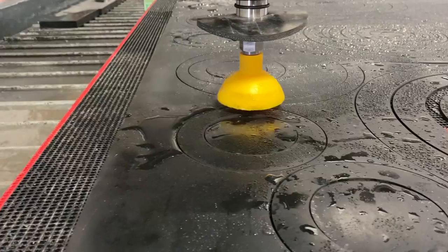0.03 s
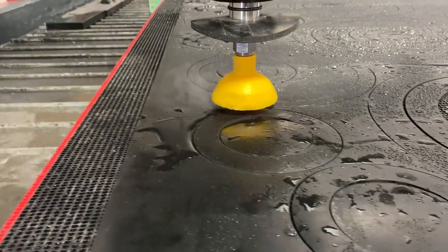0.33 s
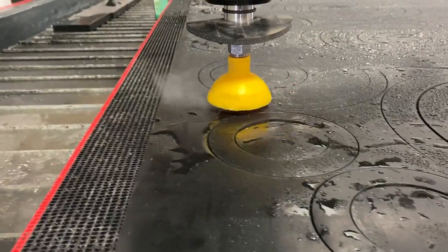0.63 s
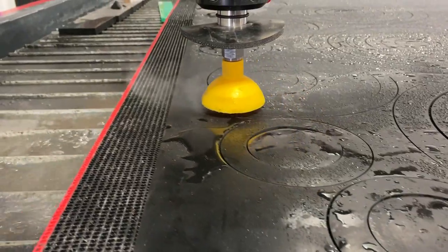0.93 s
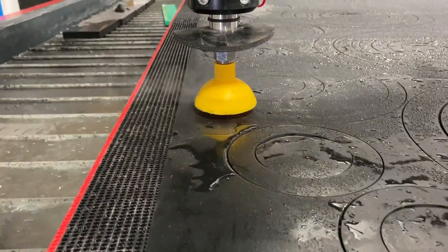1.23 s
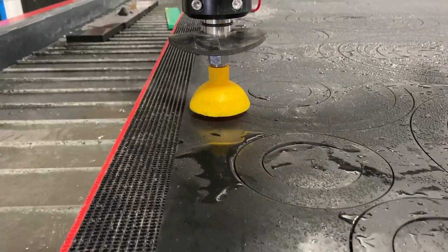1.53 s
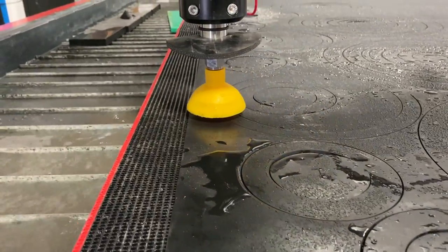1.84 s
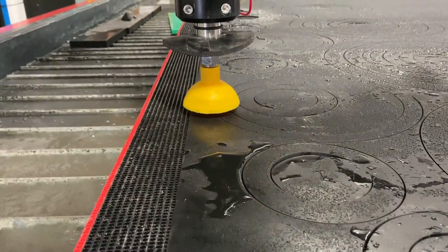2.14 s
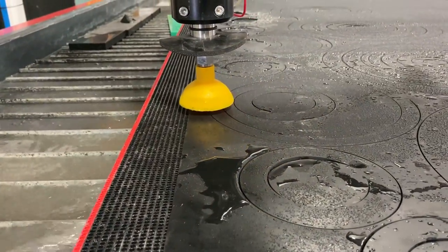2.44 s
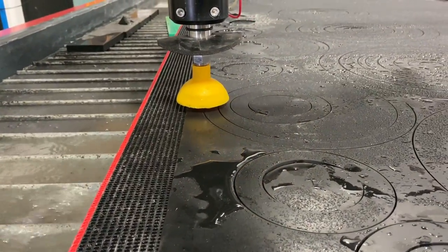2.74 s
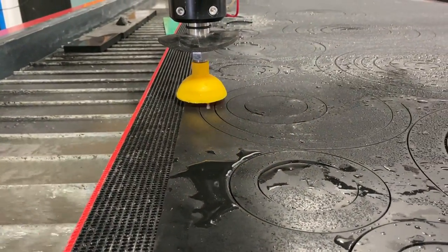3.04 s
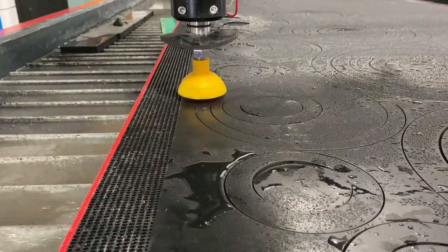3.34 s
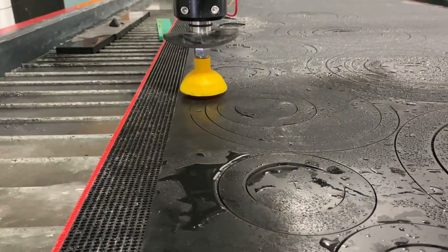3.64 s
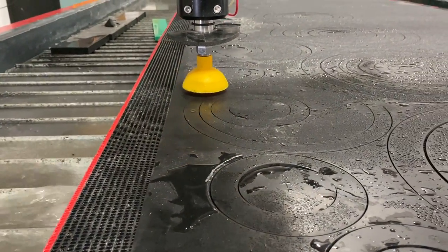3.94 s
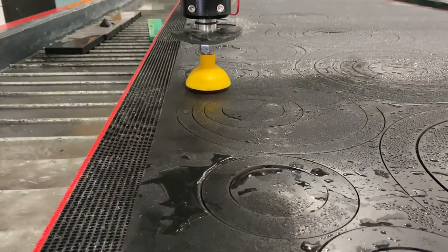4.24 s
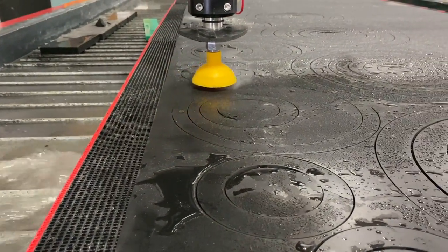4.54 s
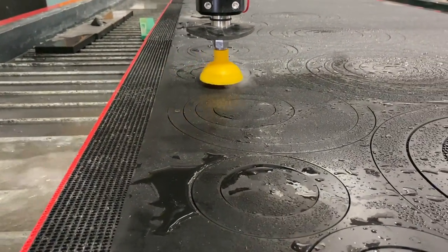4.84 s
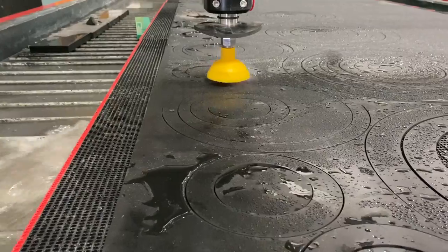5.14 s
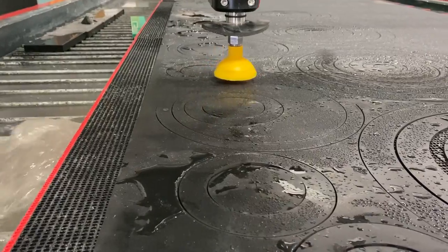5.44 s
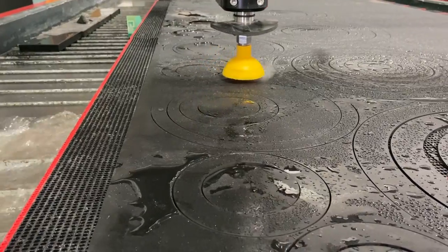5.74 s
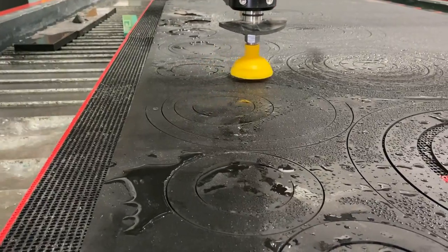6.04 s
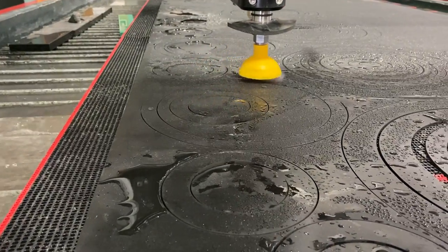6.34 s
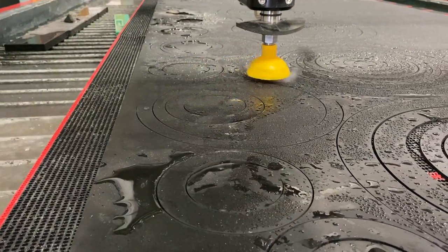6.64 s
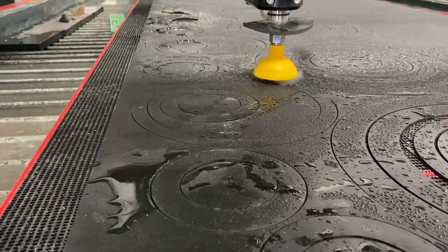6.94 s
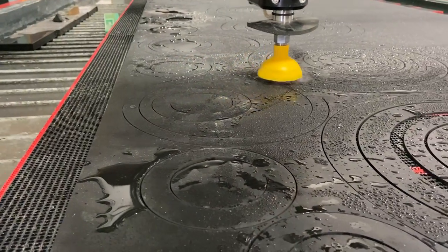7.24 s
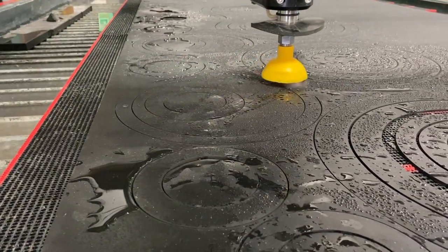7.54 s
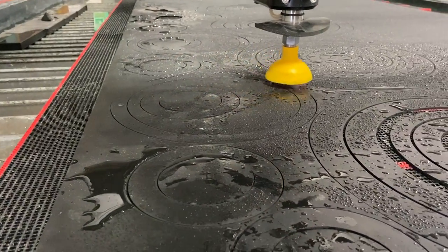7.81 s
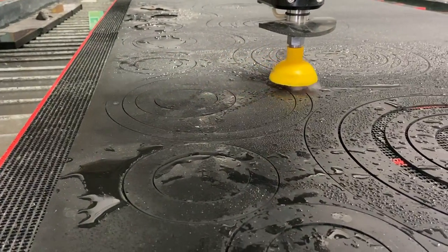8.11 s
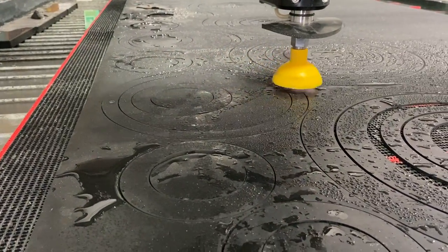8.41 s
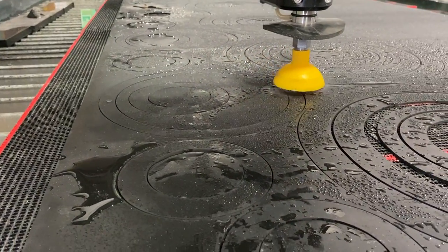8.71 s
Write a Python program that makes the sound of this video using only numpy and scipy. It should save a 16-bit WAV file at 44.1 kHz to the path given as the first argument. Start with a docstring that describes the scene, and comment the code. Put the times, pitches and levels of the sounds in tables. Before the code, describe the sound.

A continuous, high hiss comes from a nearby water jet cutting rubber in a workshop. Bursts of sputtering, sizzling spray soon join it, slightly to the left, and water briefly bubbles up onto the sheet. From about halfway the spray settles to lighter spitting. Deep churning, gurgling and soft thumps from the water tank and an even background rush run beneath it all.

```python
"""A bright, steady hiss over churning water: a high-pressure jet cuts a rubber sheet on a tank's slats.
The hiss is rushing air and droplets ringing the nozzle and its splash cup. Below, the spent jet drags
air into the tank, where bubbles gurgle and big pockets thump; once, water wells up onto the sheet.
In front, the deflected spray rasps, spits, sings and sizzles in surges,
hardest in the first half, as the head works toward the left edge."""
import sys
import numpy as np
from scipy import signal
from scipy.fft import rfft, irfft, next_fast_len
from scipy.io import wavfile

SR = 44100
rng = np.random.default_rng(int(sys.argv[2]) if len(sys.argv) > 2 else 0)


def output_pcm(signal):
    """Save a mono or channel-first signal as 16-bit PCM at the path in sys.argv[1].

    Samples are clipped to [-1, 1] before scaling.
    """
    pcm = np.clip(np.atleast_2d(signal).T, -1, 1) * 32767
    wavfile.write(sys.argv[1], SR, np.round(pcm).astype(np.int16))


N = 395577


def from_db(db):
    """Decibels to gain."""
    return 10 ** (np.asarray(db) / 20)


def rms_one(x):
    """Scale to unit rms."""
    return x / np.sqrt(np.mean(x ** 2) + 1e-20)


def automation(rows):
    """Breakpoints (time, values...) to one sample-by-sample curve per value column."""
    times, *columns = np.transpose(rows)
    return [np.interp(np.arange(N) / SR, times, column) for column in columns]


def drift(rate):
    """Smooth random modulation of rms about 1 that changes about `rate` times a second."""
    hop, settle = 40, 2000
    pole = np.exp(-2 * np.pi * rate * hop / SR)
    noise = rng.standard_normal(N // hop + settle + 2)
    slow = signal.lfilter([1], [1, -2 * pole, pole * pole], noise)[settle:]
    return np.interp(np.arange(N) / hop, np.arange(len(slow)), rms_one(slow))


def delay(x, delay_s):
    """The same sound a little later."""
    return np.interp(np.arange(N) - delay_s * SR, np.arange(N), x, left=0)


def resonate(x, hz, width_hz):
    """A two-pole resonance with gain 1 at its peak."""
    radius = np.exp(-np.pi * width_hz / SR)
    feedback = [1, -2 * radius * np.cos(2 * np.pi * hz / SR), radius ** 2]
    return signal.lfilter(np.array([1, 0, -1]) * (1 - radius ** 2) / 2, feedback, x + 1e-18)


def equalise(x, curve):
    """Shape x with an EQ curve of (frequency, gain) points; rms 1."""
    size = next_fast_len(N)
    hz, gain_db = np.transpose(curve)
    bin_hz = np.arange(size // 2 + 1) * SR / size
    gain = from_db(np.interp(np.log(bin_hz + 1), np.log(hz), gain_db, left=-90, right=-90))
    return rms_one(irfft(rfft(x, size) * gain, size)[..., :N])


def grains(per_s, spread_db):
    """Random impacts, many small and a few large; rms 1."""
    hits = rng.random(N) < per_s / SR
    sizes = from_db(spread_db * np.minimum(rng.exponential(1, N), 4))
    polarity = np.sign(rng.random(N) - .5)
    return rms_one(hits * sizes * polarity)


def bubbles(low_hz, high_hz, per_s, cycles, spread_db, count=14):
    """Bubbles of `count` sizes, each ringing for a few cycles; rms 1."""
    rings = (resonate(grains(per_s / count, spread_db), hz, hz / cycles)
             for hz in np.geomspace(low_hz, high_hz, count))
    return rms_one(sum(rms_one(ring) for ring in rings))


def turbulence(modes, drop_share, wander_db, wander_rate):
    """Rushing air and droplets ring resonances whose levels wander; returns (direct, scattered)."""
    out = np.zeros((2, N))
    drops = grains(per_s=2500, spread_db=6.0)
    for hz, width_hz, level_db in modes:
        drive = rng.standard_normal((2, N))
        drive[0] += drop_share * np.roll(drops, rng.integers(N))
        ring = resonate(resonate(drive, hz, width_hz), hz, width_hz)
        gain = from_db(level_db + wander_db * drift(wander_rate))
        out += ring / ring.std(axis=1, keepdims=True) * gain
    return out


def stereo(direct, scattered, pan_db):
    """Direct sound reaches both ears in phase, scattered sound in opposition; positive pan is left."""
    balance = from_db(np.array([pan_db, -pan_db]).reshape(2, -1) / 2)
    return np.array([direct + scattered, direct - scattered]) * balance


def reflections(direct, scattered, pan_db):
    """Sheet, gantry and tank wall echo; a source further left is wider and leads in the left ear."""
    mid = direct + 0.18 * delay(direct, .0113)
    side = 0.056 * delay(direct, 0.00144) - .5 * delay(direct, 0.0054) + 0.76 * scattered
    left, right = stereo(mid, from_db(-8 + 0.59 * pan_db) * side, pan_db)
    lag_rad = 0.26 * pan_db
    lagging_right = signal.hilbert(right, next_fast_len(N))[:N] * np.exp(-1j * lag_rad)
    return np.array([left, lagging_right.real])


# Tone of the background bed: (frequency [Hz], relative gain [dB])
WASH_EQ = [(25, -22), (82, 6.5), (189, -3.5), (446, -17), (532, -19), (808, -14.5), (963, -14.5),
           (1710, -9), (1910, -19.5), (3230, -18.5), (4490, -38), (4800, -82)]

def wash():
    """The bed: an even rush of tank and shop, nearly mono in the bass."""
    direct, scattered = equalise(rng.standard_normal((2, N)), WASH_EQ)
    scattered = signal.sosfilt(signal.butter(1, 600, "high", fs=SR, output="sos"), scattered)
    return from_db(-38.5) * stereo(direct, from_db(-22) * scattered, pan_db=-0.65)


# Tone of large slow bubbles and of small ones near the surface: (frequency [Hz], relative gain [dB])
CHURN_EQ = [(25, -30), (40, -28), (55, -12.5), (90, -1.5), (130, -1.5), (220, 2), (290, -8), (400, -21)]
GURGLE_EQ = [(180, -11.5), (280, -2), (400, -4), (520, -3.5), (660, -4.5), (800, -5.5), (1100, -14.5)]
# Faders of the same two bubble layers: (time [s], level before trim [dB])
CHURN_FADER = [(0.1, -33.5), (0.99, -27), (1.5, -29), (1.9, -34.5), (2.08, -31), (3.3, -38.5), (3.44, -31),
               (4.33, -31.5), (4.45, -36.5), (5.36, -33.5), (5.8, -45), (5.93, -33), (8.97, -33.5)]
GURGLE_FADER = [(0.1, -40.5), (0.55, -32), (1.15, -33), (1.73, -34.5), (2.1, -31.5), (2.15, -34.5),
                (2.47, -31), (2.52, -40), (3.01, -31), (4.5, -40), (4.7, -35), (5.62, -44), (6.4, -36),
                (8.97, -43)]

def tank(pan_db, churn_trim_db=-0.5, gurgle_trim_db=-1):
    """The spent jet drags air under water: a deep churn and a lighter gurgle."""
    churn_db, = automation(CHURN_FADER)
    gurgle_db, = automation(GURGLE_FADER)
    churn = equalise(bubbles(45.8, 357, per_s=750, cycles=2.5, spread_db=3.5), CHURN_EQ)
    gurgle = equalise(bubbles(244.4, 866, per_s=1100, cycles=15.4, spread_db=3.5), GURGLE_EQ)
    churn_scatter = from_db(-16.5) * equalise(rng.standard_normal(N), CHURN_EQ)
    gurgle_scatter = equalise(rng.standard_normal(N), GURGLE_EQ)
    deep = stereo(churn, churn_scatter, pan_db=-2.1)
    light = reflections(gurgle, gurgle_scatter, 0.39 * pan_db)
    return deep * from_db(churn_db + churn_trim_db) + light * from_db(gurgle_db + gurgle_trim_db)


# Thumps of big air pockets bursting in the tank: (time [s], peak [dB], starting pitch [Hz])
POCKET_HITS = [(0.895, -17, 91), (1.118, -19, 148), (1.476, -21, 196), (2.26, -17, 172), (3.372, -15.5, 95),
               (3.523, -21, 114), (3.691, -18.5, 112), (4.274, -19.5, 130), (4.368, -25, 110),
               (6.01, -20, 120), (7.102, -17, 196), (7.44, -23, 161)]

def air_pockets(swell_cycles=0.63, rise=1.5):
    """A pocket swells, rings and bends up in pitch as it nears the surface; small ones die sooner."""
    out, t = np.zeros(N + SR), np.arange(SR // 8) / SR
    for start_s, peak_db, hz in POCKET_HITS:
        at, age = int(start_s * SR), t * hz / swell_cycles
        envelope = from_db(peak_db) * age * np.exp(1 - age)
        out[at:at + len(t)] += envelope * np.sin(2 * np.pi * hz * t * (1 + rise * t))
    return stereo(out[:N], 0, pan_db=-1.2)


# Fader of the water welling up through the cut: (time [s], level [dB])
SPLASH_FADER = [(2.55, -61), (2.75, -33.5), (2.88, -33), (3.12, -45), (3.22, -49), (3.3, -67)]

def splash(pan_db):
    """Small bubbles burst in the water that wells up onto the sheet."""
    level_db, = automation(SPLASH_FADER)
    froth = bubbles(500, 1790, per_s=900, cycles=18.0, spread_db=3.0)
    return reflections(from_db(level_db) * froth, 0, pan_db)


# Resonances of the nozzle and its cup: (frequency [Hz], width [Hz], level before fader [dB])
HISS_BANDS = [(12100, 810, -47), (13860, 450, -42), (14550, 630, -39), (15300, 520, -36.3)]
WHISTLE_BANDS = [(10040, 800, -40), (10470, 270, -40)]
RUSH_BANDS = [(5286, 340, -47), (6170, 1280, -40.5), (7530, 1900, -47.5)]
# Faders of the nozzle: (time [s], whistle gain [dB], rush gain [dB])
NOZZLE_FADERS = [(0.1, 6, 4), (1.1, 5, 3), (3.2, 4.5, -3.5), (4.3, -1, 2.5), (4.35, 0, 1.5),
                 (5.7, 1.5, 2.5), (8.4, 1.5, 4), (8.97, -1.5, 1)]

def nozzle(sputter):
    """The jet's own voice: a fine hiss, the cup's airy whistle and a lower rush, all lightly shaken."""
    whistle_db, rush_db = automation(NOZZLE_FADERS)
    hiss_db = 0.3 + 0.35 * whistle_db   # the hiss follows part of the whistle's swing
    layers = (HISS_BANDS, hiss_db), (WHISTLE_BANDS, whistle_db), (RUSH_BANDS, rush_db)
    direct, scattered = sum(
        from_db(gain_db) * turbulence(bands, drop_share=0.64, wander_db=0.87, wander_rate=13)
        for bands, gain_db in layers)
    direct = direct + 0.26 * delay(direct, 0.005)
    return stereo(direct, from_db(-9.5) * scattered, pan_db=-0.25) * from_db(.5 * sputter)


# Crackles of drops spat out of the cut: (time [s], level before trim [dB])
SPIT_HITS = [(2.109, -24), (2.168, -20), (3.2954, -26), (3.365, -33), (3.407, -31), (3.979, -30),
             (4.0063, -30), (4.095, -26), (5.2026, -33), (5.246, -28), (5.305, -29), (5.408, -28),
             (5.4296, -33), (5.8606, -31), (6.635, -34), (6.573, -28), (6.821, -31), (6.87, -33),
             (7.0145, -34), (7.3167, -30), (7.3885, -35), (7.9344, -29), (8.0207, -31), (8.099, -30),
             (8.312, -33), (8.3764, -34), (8.413, -42), (8.5804, -29)]

def spits(trim_db=-11, length_s=0.038, centre_hz=3390, pitch_spread=0.13, width_hz=230, drops=26):
    """A burst of drops with a few stragglers; each ticks and rings briefly at its own pitch."""
    out, t = np.zeros(N + SR), np.arange(SR // 10) / SR
    for start_s, level_db in SPIT_HITS:
        arrival, size, detune = rng.random((3, drops))
        onset_s = -.5 * length_s * np.log(arrival[:, None])
        age = np.maximum(t - onset_s, 0)
        hz = centre_hz * (1 + pitch_spread * (2 * detune[:, None] - 1))
        rings = np.exp(-np.pi * width_hz * age) * np.cos(2 * np.pi * hz * age) * (age > 0)
        crackle = (size - .5) @ rings
        crackle /= np.sqrt(np.sum(crackle ** 2) / (length_s * SR))
        at = int(start_s * SR)
        out[at:at + len(t)] += from_db(level_db + trim_db) * crackle
    return out[:N]


# Notes of a cavity or slat edge caught by the jet:
# (start [s], length [s], pitch [Hz], width [Hz], level [dB])
EDGE_NOTES = [(0.101, 0.39, 1740, 300, -42), (0.554, 0.086, 282, 101, -23.5), (0.715, 0.053, 644, 200, -33),
              (0.845, 0.036, 7000, 650, -30.5), (1.001, 0.063, 3230, 700, -31.5),
              (0.719, 0.5, 370, 201, -35.5), (1.184, 0.049, 3030, 600, -35),
              (1.253, 0.052, 3150, 650, -29.5), (1.364, 0.11, 3200, 750, -28.5),
              (1.507, 0.065, 7100, 700, -34), (1.511, 0.065, 2250, 500, -37),
              (1.642, 0.11, 3200, 600, -30.5), (1.778, 0.14, 2120, 160, -30.5),
              (1.78, 0.14, 2440, 140, -36), (1.777, 0.13, 2910, 140, -42), (1.812, .11, 660, 160, -31),
              (1.83, 0.021, 6950, 700, -29), (1.89, 0.021, 3530, 600, -30), (2.03, 0.1, 620, 201, -30),
              (2.198, .26, 1746, 260, -28.5), (2.257, 0.24, 685, 110, -38), (2.289, 0.22, 3560, 340, -36),
              (2.716, 0.027, 7270, 700, -30.5), (2.718, 0.19, 2210, 220, -33.5),
              (2.801, .41, 1050, 222, -37), (2.8, 0.15, 1140, 260, -38.5), (3.003, 0.043, 2240, 600, -32),
              (3.088, 0.043, 660, 450, -29), (3.203, 0.036, 570, 220, -27.5),
              (3.302, 1.02, 1723, 220, -42.5), (3.297, 0.91, 3610, 320, -44),
              (3.547, 0.094, 6960, 550, -35), (3.72, 0.08, 7300, 450, -35.5), (3.85, 0.088, 7340, 450, -34),
              (5.16, 0.11, 1510, 500, -42), (7.161, 0.056, 600, 350, -36.5), (7.882, 0.82, 1653, 210, -41),
              (7.983, 0.72, 3270, 280, -47.5)]

def singing_edges(rough_db=1.5, rough_rate=77, fade_s=.012):
    """Turbulence drives a resonance that catches abruptly, flutters and breaks off as the head moves."""
    out = np.zeros(N + SR)
    flutter = from_db(rough_db * drift(rough_rate))
    for start_s, length_s, hz, width_hz, level_db in EDGE_NOTES:
        t = np.arange(int((length_s + fade_s) * SR)) / SR
        gate = np.clip(np.minimum(t, t[-1] - t) / fade_s, 0, 1)
        drive = rng.standard_normal(2 * SR)
        ring = resonate(resonate(drive, hz, width_hz), hz, width_hz)[-len(t):]
        at = int((start_s - fade_s / 2) * SR)
        out[at:at + len(t)] += from_db(level_db) * gate * rms_one(ring * flutter[at:at + len(t)])
    return out[:N]


# Swells of the spray: (start [s], length [s], rasp gain [dB], roar gain [dB], sizzle gain [dB])
SURGE_CUES = [(0.568, 0.057, -33, -33.5, -56), (0.7, 0.076, -39, -51, -33.5),
              (0.827, 0.081, -26.5, -39, -25.5), (0.97, 0.12, -29, -32.5, -50), (1.1, 0.021, -32, -40, -36),
              (1.248, 0.072, -32.5, -31, -49), (1.383, 0.14, -31, -29.5, -33.5),
              (1.516, 0.062, -30.5, -30, -26.5), (1.636, 0.11, -33.5, -29.5, -34),
              (1.775, 0.11, -30, -27, -31.5), (2.085, 0.025, -37, -29.5, -31),
              (2.177, 0.1, -28, -36, -29.5), (2.277, 0.21, -32, -33.5, -26.5),
              (2.586, 0.078, -33, -29.5, -36), (2.699, 0.13, -30, -39, -33),
              (2.996, 0.049, -30, -38, -31.5), (3.295, 0.085, -37, -52, -38),
              (3.361, 0.082, -29, -35.5, -32), (3.523, 0.11, -31.5, -38, -30.5),
              (3.688, 0.12, -36.5, -42, -37), (3.843, 0.13, -33, -46, -34), (3.998, 0.036, -35, -55, -27),
              (4.217, 0.1, -37.5, -46, -42), (5.192, .25, -43, -60, -50), (8.273, 0.17, -36.5, -58, -43)]

def surges(attack_s=0.024, release_s=0.034):
    """The jet fails to clear the cut: envelopes for rasp, roar and sizzle swell, hold and die away."""
    t, out = np.arange(N) / SR, np.zeros((3, N))
    for start_s, length_s, *gains_db in SURGE_CUES:
        swell = np.clip((t - start_s) / attack_s + .5, 0, 1)
        fade = np.exp(-np.clip((t - start_s - length_s) / release_s, 0, 20))
        out += from_db(gains_db)[:, None] * swell * fade
    return out


# Resonances the spray excites, the roar's lying under the sheet:
# (frequency [Hz], width [Hz], relative level [dB])
ROAR_BANDS = [(1103, 340, -11), (1337, 540, -10.5), (1695, 284, -6.5), (2102, 240, -14), (2340, 950, -13)]
RASP_BANDS = [(2590, 750, -13), (3330, 440, -10), (3730, 840, -11), (4220, 450, -15), (5404, 710, -6)]
SIZZLE_BANDS = [(6700, 1400, -14), (7170, 660, -9.5), (8030, 400, -11.5), (9800, 2900, -15.5),
                (10510, 930, -6.5), (12210, 770, -8.5), (14050, 600, -9), (15600, 500, -12)]
# Steady backsplash that drives all three layers: (time [s], drive [dB])
SPRAY_DRIVE = [(0.1, -44.5), (0.5, -44.5), (0.7, -40.5), (1.6, -39), (2.0, -43.5), (2.5, -39), (3.2, -44.5),
               (4.31, -43), (4.35, -52.5), (5.3, -49), (6.5, -49), (6.6, -46.5), (7.0, -45), (7.15, -49),
               (7.85, -47), (7.95, -43), (8.35, -48), (8.97, -47)]

def spray(sputter, pan_db):
    """Water thrown back from the cut: a hollow roar, a spitting rasp, singing edges and a fine sizzle."""
    drive_db, = automation(SPRAY_DRIVE)
    steady_db = [17.9 + 1.337 * drive_db, -1.8 + 0.85 * drive_db, -8.5 + 0.7 * drive_db]
    rasp_gain, roar_gain, sizzle_gain = np.hypot(from_db(steady_db), surges())   # powers add
    rasp = rasp_gain * turbulence(RASP_BANDS, drop_share=0.85, wander_db=2.0, wander_rate=21)
    roar = roar_gain * turbulence(ROAR_BANDS, drop_share=0.54, wander_db=3.0, wander_rate=9.2)
    sizzle = sizzle_gain * turbulence(SIZZLE_BANDS, drop_share=1.0, wander_db=2.5, wander_rate=18)
    direct, scattered = rasp + roar
    body = reflections(direct + spits() + singing_edges(), scattered, pan_db)
    mist = stereo(sizzle[0] + 0.72 * delay(sizzle[0], .0043), from_db(-4.5) * sizzle[1], pan_db=-0.42)
    return (body * from_db(drift(28)) + mist) * from_db(1.32 * sputter)


# Where the spray escapes: (time [s], left over right [dB])
SPRAY_PAN = [(0, 1), (1.2, 2), (2.2, 4.5), (4.4, 5.5), (6.5, 1.5), (8.97, -1)]

def scene():
    """The mix: one sputter of the jet shakes hiss and spray together, over the water and the bed."""
    pan_db, = automation(SPRAY_PAN)
    sputter = 0.77 * drift(14.3) + 1.06 * drift(64)
    jet = nozzle(sputter) + spray(sputter, pan_db)
    return jet + splash(pan_db) + tank(pan_db) + air_pockets() + wash()


# Stereo phase between the channels: the left lags more and more toward the top: # (frequency [Hz], left lead
# [rad])
LEFT_LEAD = [(200, 0), (1300, .55), (2500, 0), (7100, 0), (8700, -3.05), (9450, -3.25), (12900, -9.35),
             (13450, -9.5), (15800, -13.2)]

def record(dry):
    """The master: the top octave is nearly one signal, lagging on the left; then a steep high cut."""
    silent_s, split_hz, top_side_db, cutoff_hz = .06, 8200, -23, 15750
    size = next_fast_len(N)
    hz = np.arange(size // 2 + 1) * SR / size
    left, right = rfft(dry * (np.arange(N) > silent_s * SR), size)
    top = np.clip((hz - split_hz) / 800 + .5, 0, 1)
    mid = (left + right) / 2
    side = (left - right) / 2 * from_db(top * top_side_db)
    lead = np.exp(1j * np.interp(hz, *np.transpose(LEFT_LEAD)))
    low_pass = 1 / np.sqrt(1 + (hz / cutoff_hz) ** 400)
    return irfft(np.array([(mid + side) * lead, mid - side]) * low_pass, size)[:, :N]


dry = scene()
out = record(dry)
output_pcm(out)
```